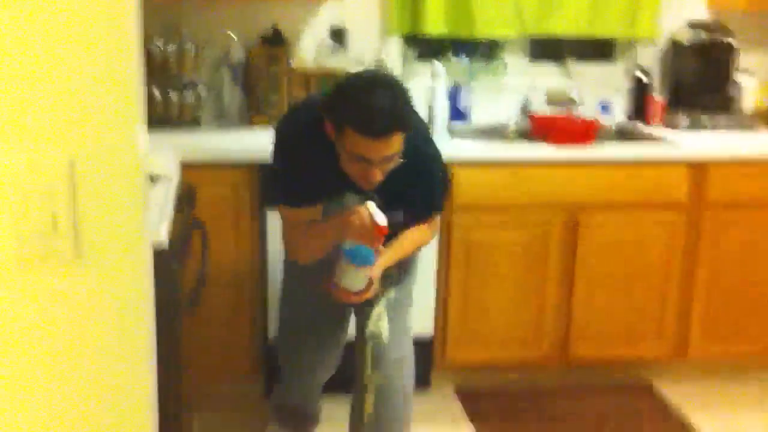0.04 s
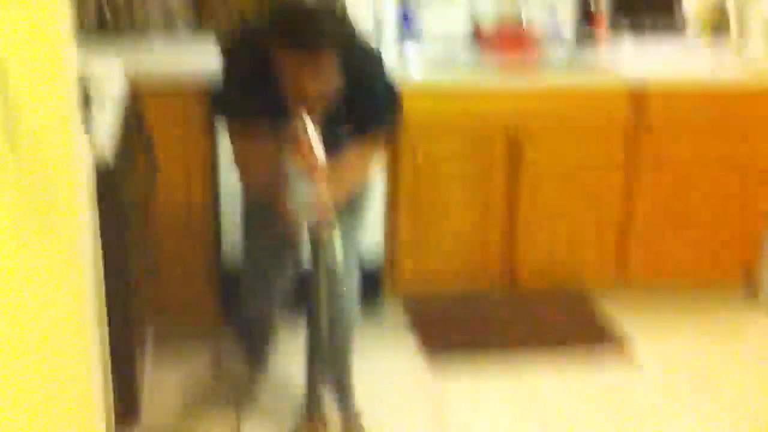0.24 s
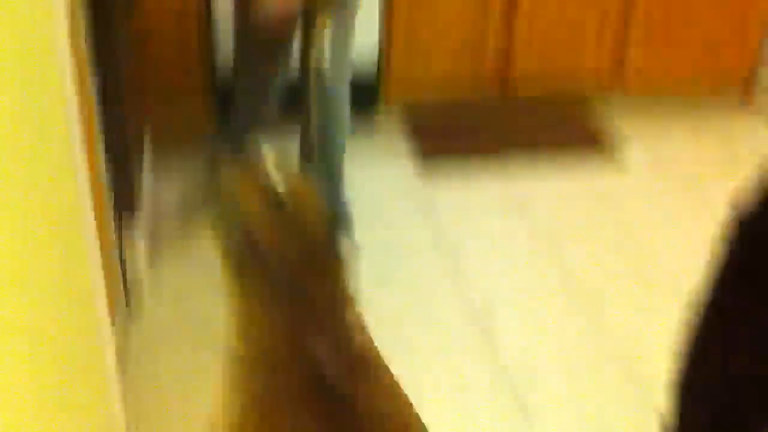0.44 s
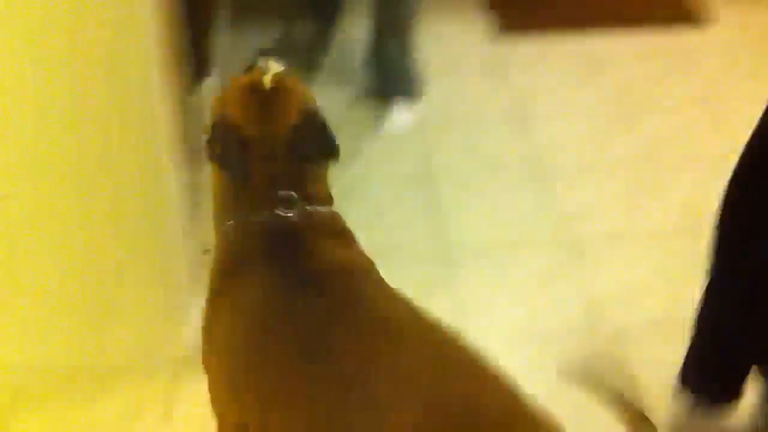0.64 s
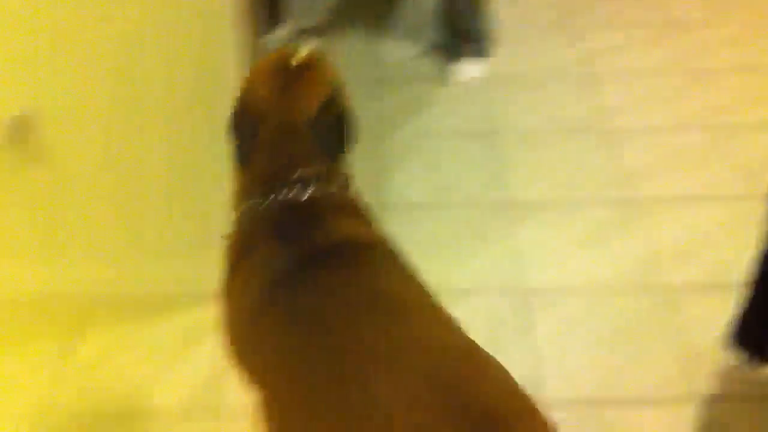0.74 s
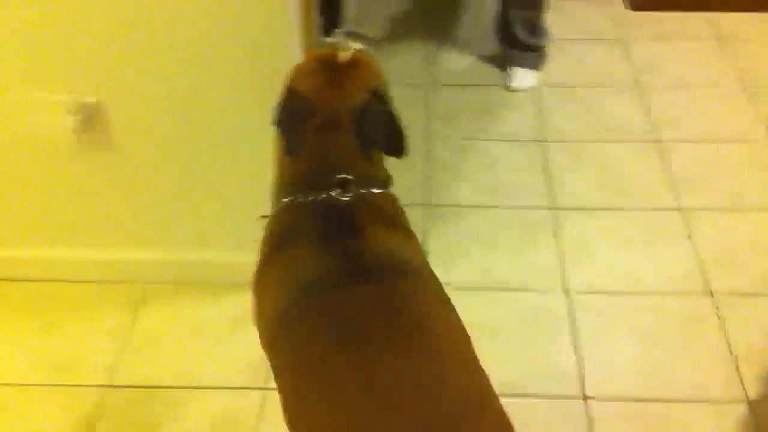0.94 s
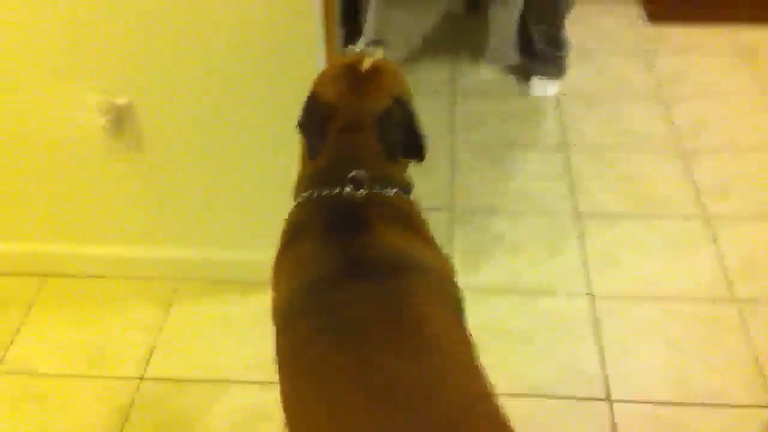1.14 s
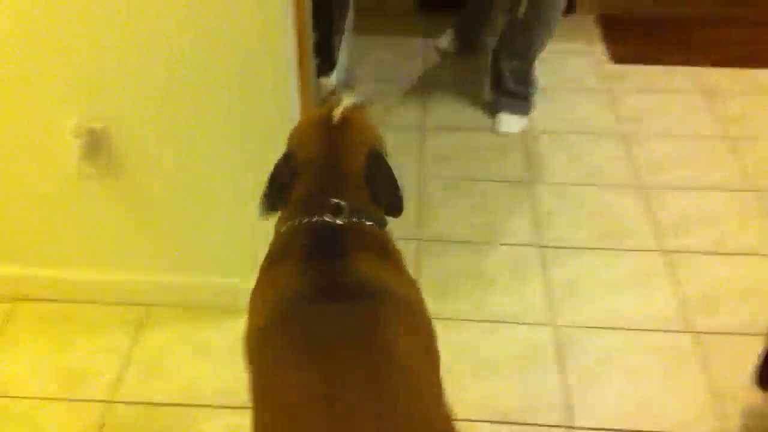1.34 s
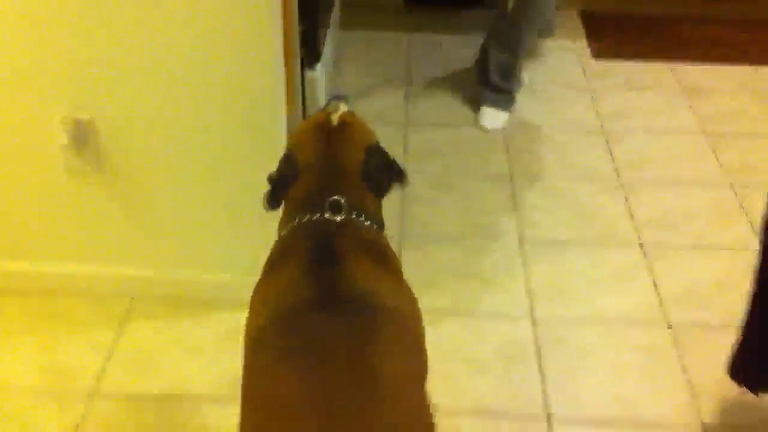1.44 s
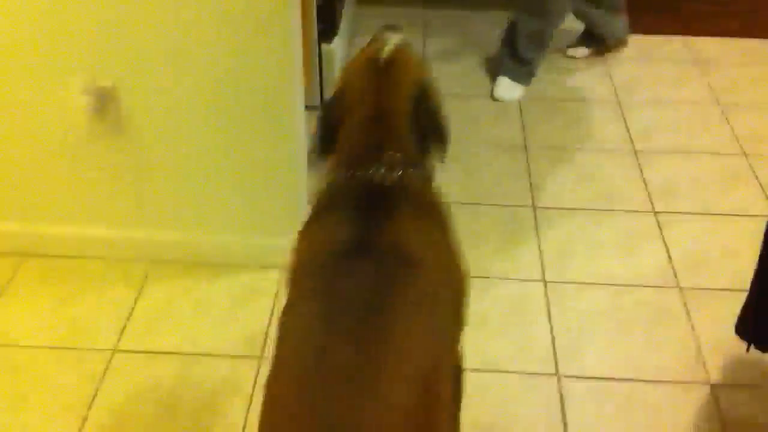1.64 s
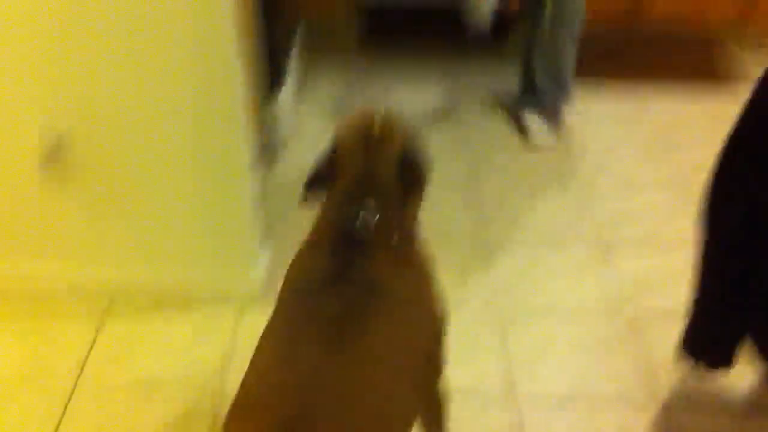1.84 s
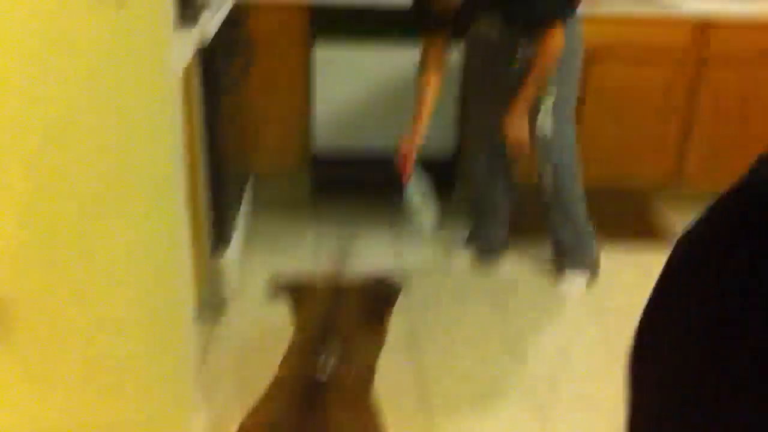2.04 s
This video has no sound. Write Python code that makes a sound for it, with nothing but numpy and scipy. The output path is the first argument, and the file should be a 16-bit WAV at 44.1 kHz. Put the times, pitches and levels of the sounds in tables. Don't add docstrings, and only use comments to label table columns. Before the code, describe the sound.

A large dog barks loudly in a reverberant tiled kitchen. Faint paw scuffs and claw ticks lead to a rising, throaty bark at 0.2 s. From 0.6 to 1 s come short, hoarse, quiet whines with scuffing and a small ring near 0.95 s. After a pause, two rough barks follow at 1.35 and 1.63 s, then a light scuff around 1.9 s. Low room hiss and faint fridge hum dip under the barks; phone microphone.

```python
import sys
import numpy as np
from scipy import signal
from scipy.fft import rfft, irfft
from scipy.io import wavfile
from scipy.ndimage import uniform_filter1d, minimum_filter1d

SR = 44100
rng = np.random.default_rng(int(sys.argv[2]) if len(sys.argv) > 2 else 0)


def gain_from_decibels(decibels):
    exponent = np.asarray(decibels, float) / 20
    return 10 ** exponent


def inscribe(sig):
    pcm = np.round(np.clip(np.atleast_2d(sig).T, -1, 1) * 32767)
    wavfile.write(sys.argv[1], SR, pcm.astype(np.int16))


N = 92610


def read(points, hz):
    f, value = np.transpose(points)
    return np.interp(np.log(hz + 1), np.log(f + 1), value)


def evened(x):
    return x / np.sqrt(np.mean(x ** 2) + 1e-20)


def curves(table):
    rows = np.transpose(table)
    t = np.arange(rows[0][0], rows[0][-1], 1 / SR)
    return round(rows[0][0] * SR), [np.interp(t, rows[0], col) for col in rows[1:]]


def add(mix, at, sound):
    part = mix[at:][:len(sound)]
    part += sound[:len(part)]


def drift(count, hz):
    return evened(signal.lfilter(*signal.butter(2, hz, fs=SR), rng.standard_normal(N)))[:count]


def resonate(x, hz, width_hz):
    turn = np.exp(2j * np.pi * np.cumsum(hz * np.ones(len(x))) / SR)
    r = np.exp(-np.pi * width_hz / SR)
    return 2 * (turn * signal.lfilter([1 - r], [1, -r], x / turn)).real


def coloured(x, spectrum):
    gain = gain_from_decibels(read(spectrum, np.fft.rfftfreq(len(x), 1 / SR)))
    return evened(irfft(rfft(x) * gain, len(x)))


# freq_hz, level_db_per_hz
FLOOR = [(35, -58), (60, 1), (159, -13.5), (231, -35.5), (453, 1), (1350, -37), (1590, -8.5), (2410, -26.5),
         (15500, -42)]
# freq_hz, level_db
HUM = [(222, -57)]
FLOOR_DB = -51


def background():
    t = np.arange(N) / SR
    hum = np.zeros(N)
    for hz, db in HUM:
        level = gain_from_decibels(db + 2 + 3.4 * drift(N, 24))
        hum += level * np.sin(2 * np.pi * hz * t + 1.3 * drift(N, 7))
    return gain_from_decibels(FLOOR_DB - 4.0) * coloured(rng.standard_normal(N), FLOOR) + hum


# freq_hz, t60_s
KITCHEN = [(150, 0.52), (400, 0.58), (900, 0.57), (2000, 0.57), (5000, 0.7), (12000, .3)]


def kitchen():
    taps = np.zeros(SR)
    at = np.arange(120, SR - 20, 20)
    taps[at + rng.integers(0, 20, len(at))] = rng.choice([-1., 1.], len(at))
    hz, frames_s, z = signal.stft(taps, SR, nperseg=256)
    t60_s = np.maximum(read(KITCHEN, hz), .05)[:, None]
    tail = signal.istft(z * gain_from_decibels(-60 * frames_s / t60_s), SR, nperseg=256)[1][:SR]
    return tail / np.linalg.norm(tail)


DIRECT_DB, SWAY_HZ = -2.5, 4.0


def placed(at, sound, wet_db):
    x = np.zeros(N)
    add(x, at, sound)
    sway = 2 * np.pi * SWAY_HZ * np.arange(N) / SR
    wet = sum(signal.fftconvolve(x * turn(sway), kitchen())[:N] for turn in (np.sin, np.cos))
    return gain_from_decibels(DIRECT_DB) * x + gain_from_decibels(wet_db) * wet


# start_s, level_db, pitch_hz,
# fade_db_per_s
SQUEAK = [(.938, -37, 2085, 140), (.95, -45, 2062, 90), (1.862, -46, 1750, 700), (.575, -71, 13450, 300),
          (2.03, -70, 13450, 200), (2.03, -75, 14200, 200)]


def rings():
    out, t = np.zeros(N), np.arange(N) / SR
    for start_s, db, hz, fade_db_per_s in SQUEAK:
        envelope = gain_from_decibels(db - abs(fade_db_per_s) * t) * np.minimum(t / 0.0068, 1)
        add(out, round(start_s * SR), envelope * np.sin(2 * np.pi * hz * t))
    return out


# time_s, level_db
SCUFF = [(0, -42.5), (.045, -41), (.1, -44), (.185, -53.5), (.2, -35.5), (.45, -42), (.56, -65), (.61, -60),
         (.66, -41), (.74, -37.5), (.83, -37), (.95, -37), (1.08, -45.5), (1.2, -59.5), (1.3, -73),
         (1.85, -54), (1.89, -39.5), (1.97, -48)]
# freq_hz, level_db_per_hz
SCUFF_TONE = [(53, -55), (90, -42.5), (473, -6), (793, -12), (1030, -17.5), (1360, -19), (2140, -16.5),
              (2950, -25), (15500, -38)]
# freq_hz, width_hz, level_over_scuff_db
BODY = [(192, 97, -10.5), (278, 126, -9.5), (1180, 260, -6), (1021, 210, -17)]
# start_s, peak_db, pitch_hz
CLAWS = [(0.0332, -42.5, 5930), (0.192, -33, 4560), (0.2588, -34, 3010), (0.7338, -36.5, 4000),
         (0.819, -34.5, 5640), (1.8932, -48, 5930)]


def paws():
    out = np.zeros(N)
    grit = rng.standard_normal(N) * gain_from_decibels(1.2 * drift(N, 60))
    drag = sum(gain_from_decibels(d) * evened(resonate(resonate(grit, f, w), f, w)) for f, w, d in BODY)
    at, (db,) = curves(SCUFF)
    add(out, at, gain_from_decibels(db) * (coloured(grit, SCUFF_TONE) + drag)[:len(db)])
    ticks = rng.standard_normal(size=(len(CLAWS), 800))
    t = np.arange(ticks.shape[1]) / SR
    for (start_s, peak_db, hz), fizz in zip(CLAWS, ticks):
        envelope = gain_from_decibels(peak_db + 6.5 - 60 * t / 0.058)
        add(out, round(start_s * SR), envelope * (0.11 * fizz + resonate(fizz, hz, 2700)))
    return out


# start_s, length_s, level_db, pitch_hz
WHINE = [(.628, 0.045, -35.5, 667), (.674, 0.034, -32, 606.5), (.722, 0.066, -32, 616.5),
         (.79, 0.042, -40, 600), (.838, 0.041, -33, 584.3), (.885, 0.046, -33, 560.6),
         (.932, 0.034, -36.5, 550)]
# multiple, level_db
WHINE_ORDERS = [(1, 0), (2, -14), (3, -28)]
WHINE_WOBBLE, WHINE_THROB_DB = .022, 2.5


def whine():
    out = np.zeros(N)
    for start_s, length_s, db, hz in WHINE:
        t = np.arange(0, length_s, 1 / SR)
        turns = np.cumsum(hz * (1 + WHINE_WOBBLE * drift(len(t), 70))) / SR
        tone = sum(gain_from_decibels(d) * np.sin(2 * np.pi * k * turns) for k, d in WHINE_ORDERS)
        level = gain_from_decibels(db + 6 + WHINE_THROB_DB * drift(len(t), 50))
        swell = abs(np.sin(np.pi * t / length_s)) ** 0.46
        add(out, round(start_s * SR), level * swell * tone)
    return out


# time_s, effort_db, pitch_hz, mouth_opening, roughness_0_to_1
BARKS = [
    [(.192, -37, 327.5, 1.02, 0.64), (.2, -26, 381.1, 0.92, 0.62), (.232, -13.5, 418.1, 1.04, 0.48),
     (.26, -8.5, 425.6, 0.99, 0.47), (.29, -15, 456, 1.05, 0.42), (.34, -18.5, 484.6, 1.152, .5),
     (.375, -28.5, 498, 1.135, 0.7), (.41, -41, 438, 0.98, 0.6)],
    [(1.31, -55.5, 250, 1.07, 0.99), (1.352, -29.5, 300, 0.79, 0.79), (1.372, -8.5, 389.8, 0.99, 0.49),
     (1.41, -9.5, 436.3, 1.102, 0.44), (1.45, -17.5, 439.5, 0.96, 0.6), (1.48, -15.5, 402.4, 0.81, 0.56),
     (1.51, -29, 351, 0.33, 1)],
    [(1.626, -41, 420, 1.25, 0.86), (1.631, -13, 482.8, 1.05, 0.52), (1.66, -9.5, 445.8, 1.14, 0.54),
     (1.69, -11, 424.7, 0.92, 0.65), (1.73, -23, 389.1, 1.07, 0.46), (1.78, -20, 341, 0.65, 0.82),
     (1.83, -65, 300, 1.85, 0.4)],
]
# freq_hz, width_hz, level_db
THROATS = [
    [(490, 134, 1.5), (778, 272, -8), (1297, 238, -7), (2060, 198, -20)],
    [(582, 247, 0), (840, 373, -3), (1345, 330, -8.5), (1965, 353, -19.5)],
    [(497, 170, 3), (785, 220, -1.5), (1260, 225, -9), (1886, 460, -25)],
]
# freq_hz, width_hz, level_db
RASP = [(3440, 3300, 12), (5800, 1160, 13), (9260, 1700, -8)]
WEAK_PULSE, JITTER = 0.74, .35
OPEN_DB, MUZZLE_LOW_HZ = 11, 300
RASP_DB, RASP_FOLLOW, RASP_RISE_S = -39.5, 0.86, 0.037


def throat_sound(source, throat, mouth):
    out = 0
    for k, (hz, width_hz, db) in enumerate(throat):
        once = resonate(source, hz * mouth, width_hz)
        gain = (-1) ** k * gain_from_decibels(db + k * OPEN_DB * (mouth - 1))
        out = out + gain * resonate(once, hz * mouth, 2 * width_hz)
    return evened(out)


def bark(table, throat):
    at, (db, hz, mouth, rough) = curves(table)
    count, rough = len(hz), np.clip(rough, 0, 1)
    turns = np.cumsum(hz * (1 + JITTER * rough * drift(count, 150) / 4)) / SR
    pulses = sum(np.cos(2 * np.pi * k * turns) for k in range(1, 8))
    folds = pulses * (1 + WEAK_PULSE * np.cos(np.pi * turns))
    air = (0.11 + np.exp(-(turns % 1) / 0.73)) * rng.standard_normal(N)[:count]
    voiced, noisy = throat_sound(folds, throat, mouth), throat_sound(air, throat, mouth)
    voice = gain_from_decibels(db) * ((1 - rough) * voiced + rough * noisy)
    low_cut = signal.butter(4, MUZZLE_LOW_HZ, "high", fs=SR, output="sos")
    rasp = evened(sum(gain_from_decibels(d) * resonate(resonate(air, f, w), f, 3 * w) for f, w, d in RASP))
    rise = np.minimum(.25 + np.arange(count) / SR / RASP_RISE_S, 1)
    fade = np.minimum(np.arange(count, 0, -1) / 600, 1)
    rasp_level = rise * fade * gain_from_decibels(RASP_DB + RASP_FOLLOW * (db + 6))
    return at, signal.sosfilt(low_cut, voice) + rasp_level * rasp


BARK_WET_DB, WHINE_WET_DB, PAWS_WET_DB, RINGS_WET_DB = 1.5, -8.5, -4.0, -5
DUCK_FROM_DB, DUCK_SHARE, DUCK_BACK_DB_PER_S = -24.5, 1, 65
RUMBLE_HZ, RUMBLE_SHARE = 250, 0.51


def scene():
    mix = sum(placed(*bark(table, throat), BARK_WET_DB) for table, throat in zip(BARKS, THROATS))
    mix = mix + placed(0, whine(), WHINE_WET_DB)
    mix = mix + placed(0, paws(), PAWS_WET_DB) + placed(0, rings(), RINGS_WET_DB)
    power_db = 10 * np.log10(abs(uniform_filter1d(mix ** 2, 800)) + 1e-12)
    fall_db = np.arange(N) * DUCK_BACK_DB_PER_S / SR
    held_db = np.maximum.accumulate(power_db + fall_db) - fall_db
    over_db = np.clip(held_db - DUCK_FROM_DB, 0, 25)
    rumble = signal.sosfiltfilt(signal.butter(4, RUMBLE_HZ, fs=SR, output="sos"), mix)
    late_db = signal.lfilter([.0005], [1, -.9995], over_db)
    mix = mix - rumble * (1 - gain_from_decibels(-RUMBLE_SHARE * late_db))
    return (mix + background() * gain_from_decibels(-DUCK_SHARE * over_db))[None]


def band_limit(x):
    return signal.sosfilt(signal.butter(12, 16620, fs=SR, output="sos"), x)


MIC_LOW_HZ, CEILING, EDGE_HZ = 110, .7, 15800


def record(dry):
    cut = signal.sosfilt(signal.butter(4, MIC_LOW_HZ, "high", fs=SR, output="sos"), dry)
    gain = minimum_filter1d(np.minimum(CEILING / (abs(cut) + 1e-9), 1), size=41)
    held = cut * uniform_filter1d(uniform_filter1d(gain, size=21), size=21)
    edge = signal.firwin(511, EDGE_HZ, window=("kaiser", 9), fs=SR)
    edged = signal.oaconvolve(held, edge[None], "same")
    return band_limit(edged)


dry = scene()
out = record(dry)
inscribe(out)
```